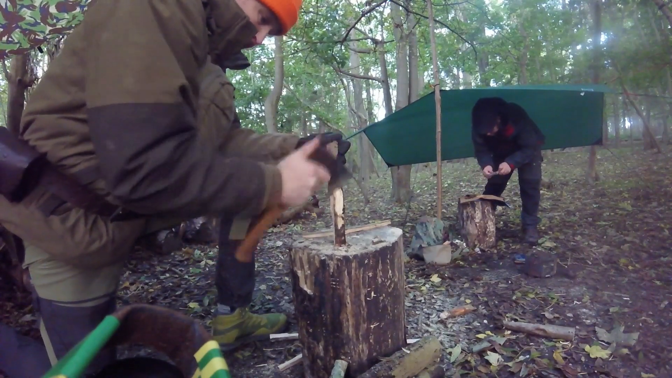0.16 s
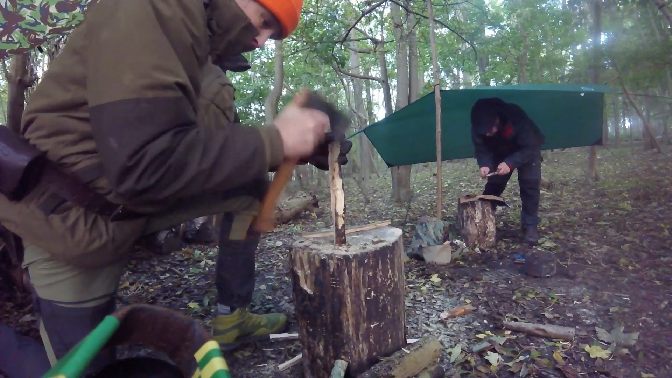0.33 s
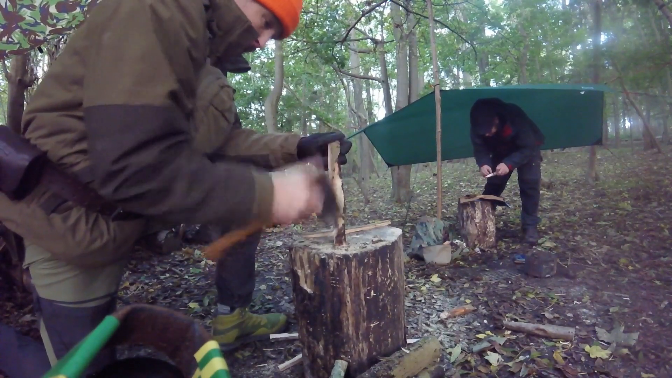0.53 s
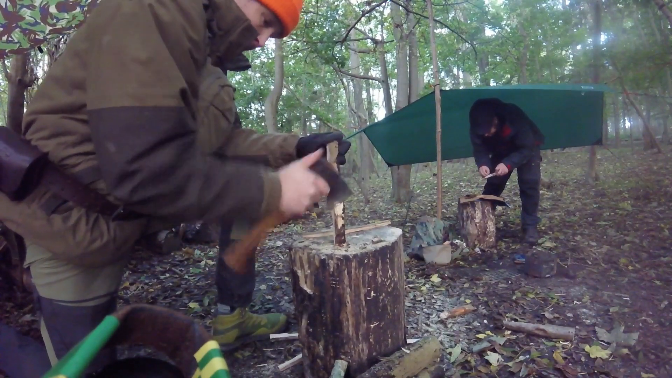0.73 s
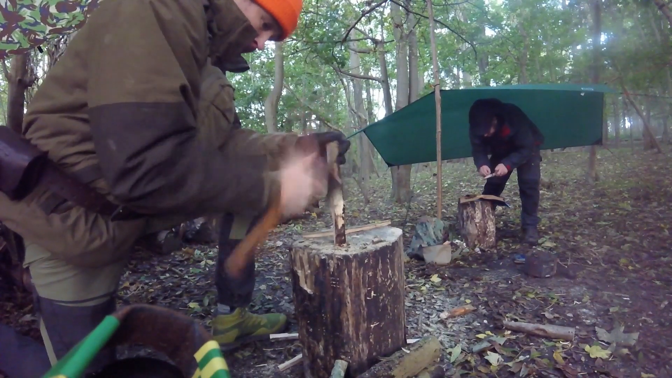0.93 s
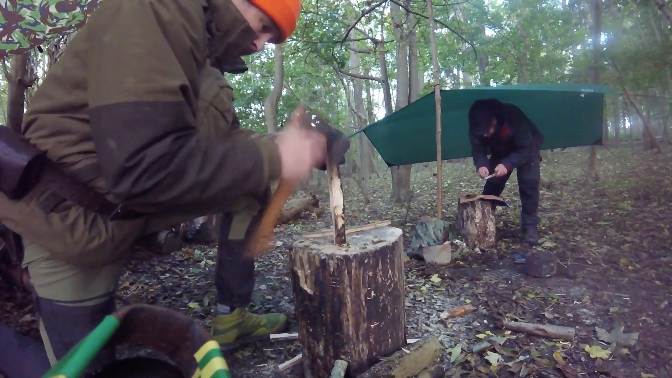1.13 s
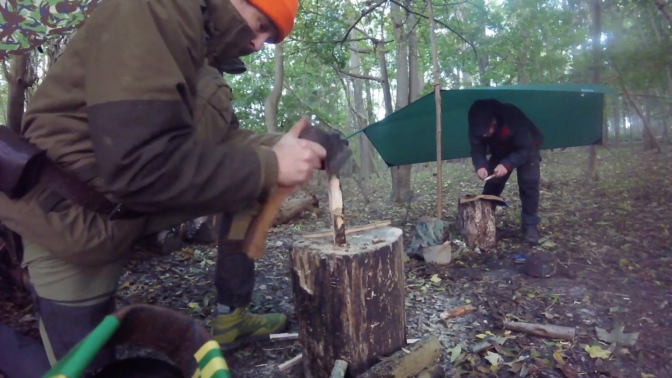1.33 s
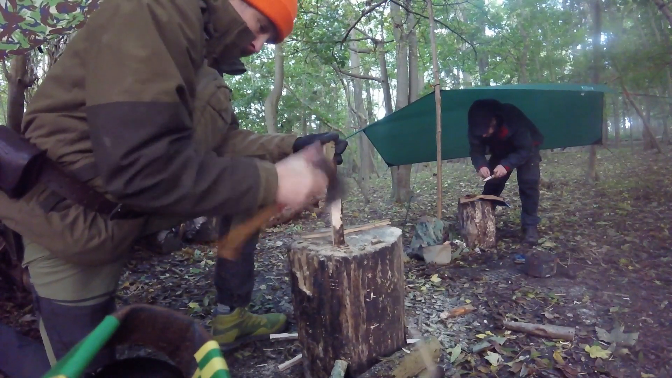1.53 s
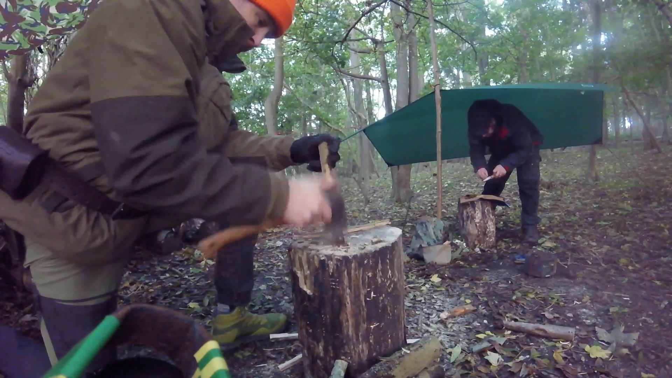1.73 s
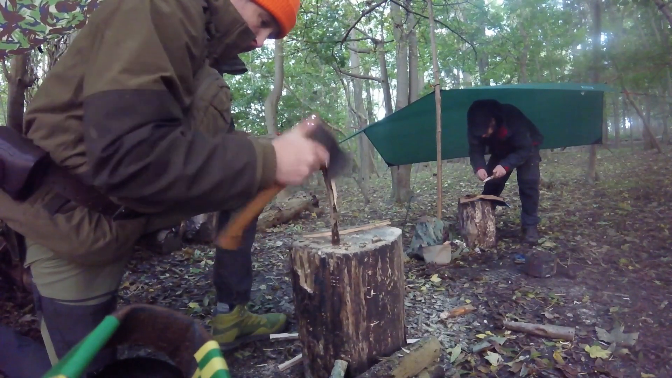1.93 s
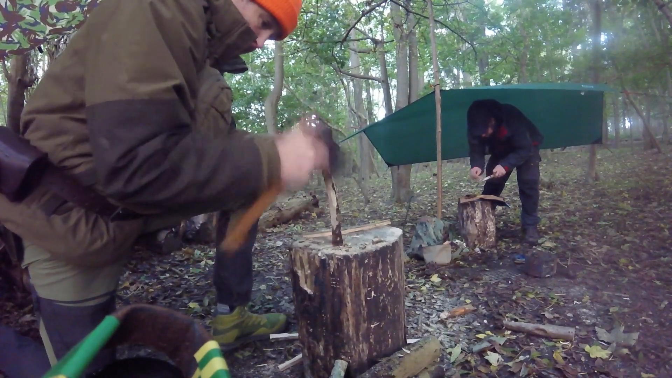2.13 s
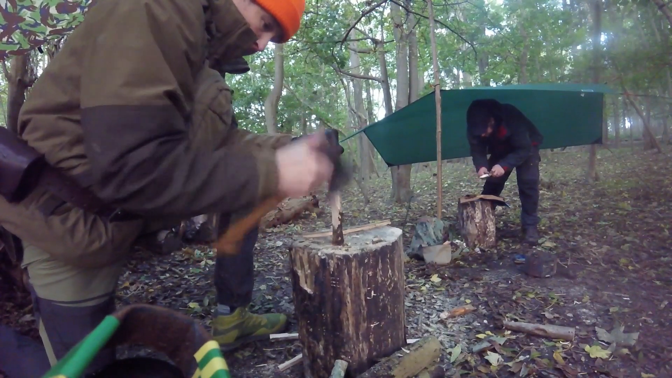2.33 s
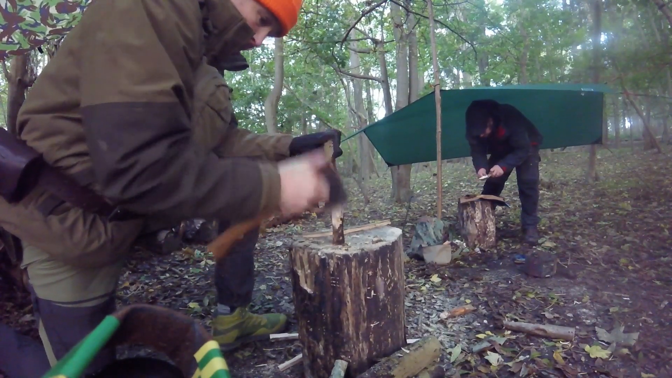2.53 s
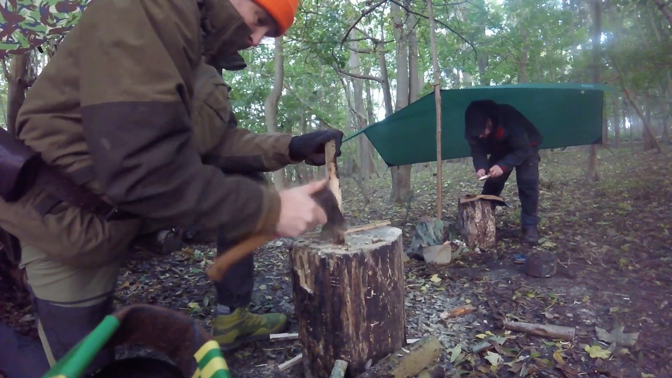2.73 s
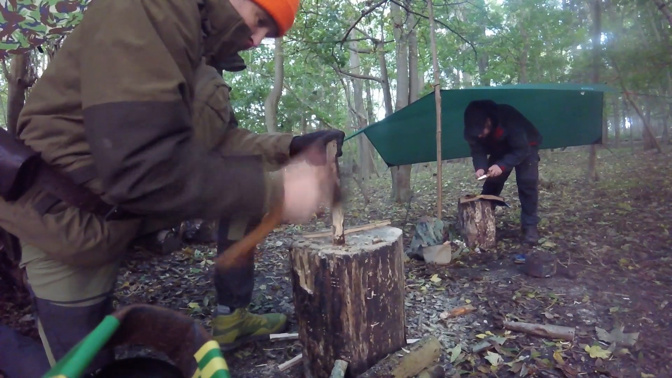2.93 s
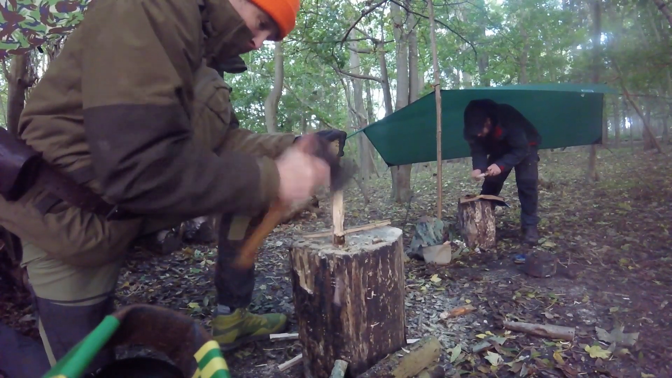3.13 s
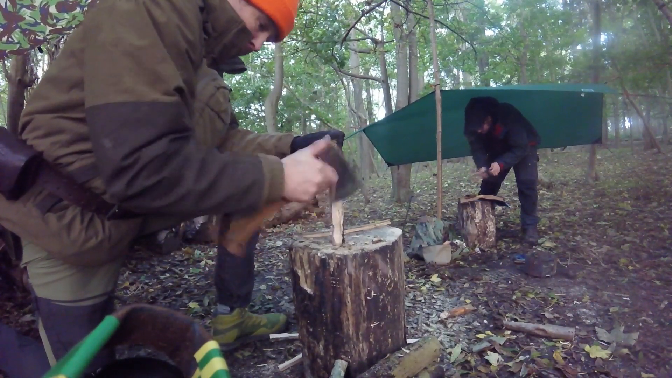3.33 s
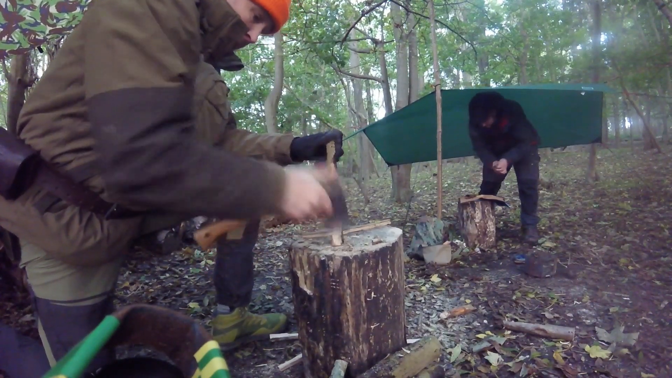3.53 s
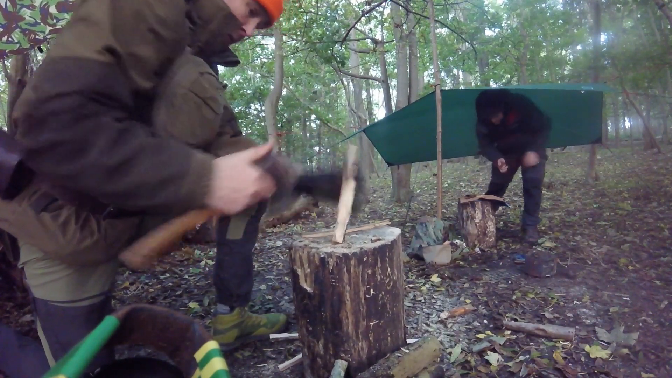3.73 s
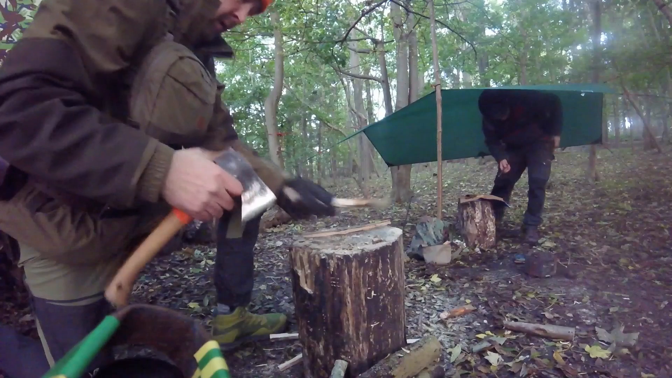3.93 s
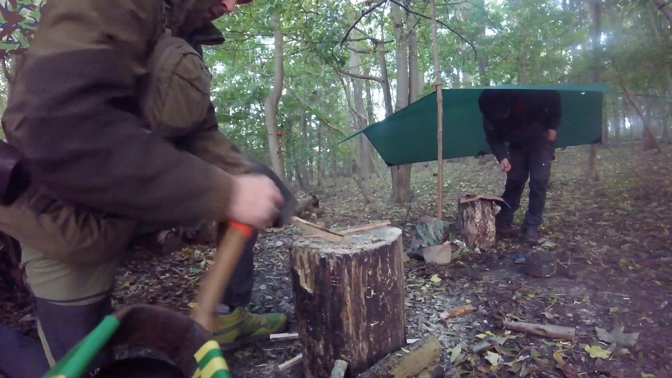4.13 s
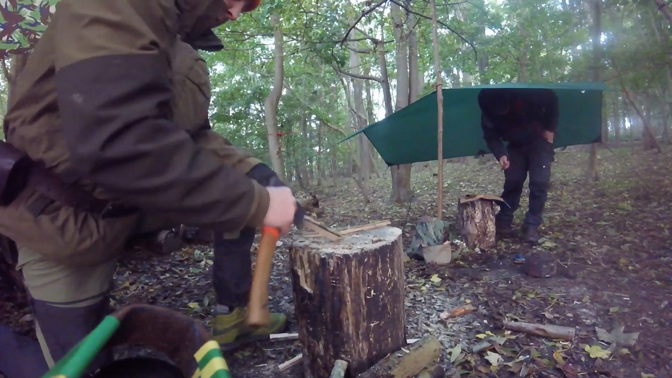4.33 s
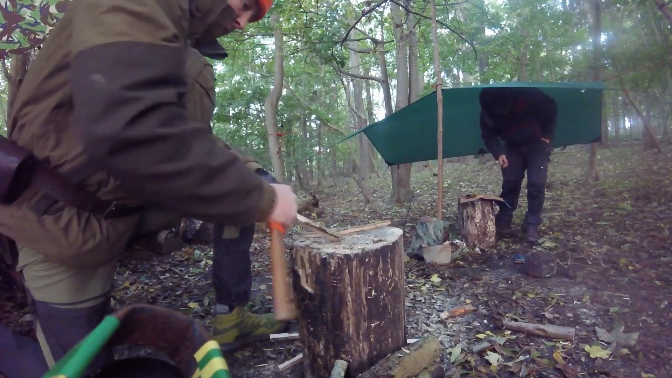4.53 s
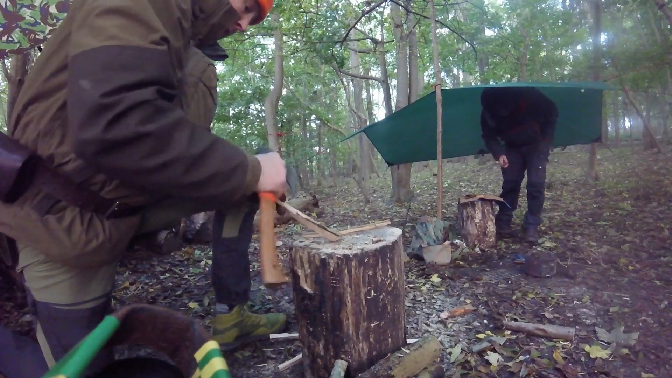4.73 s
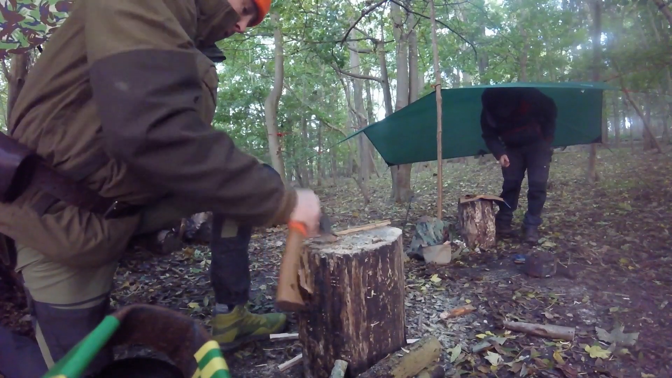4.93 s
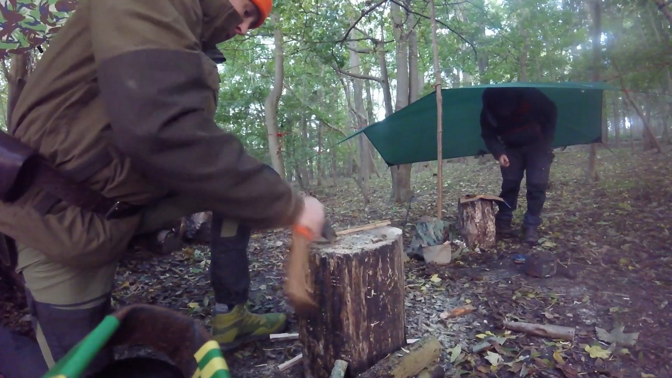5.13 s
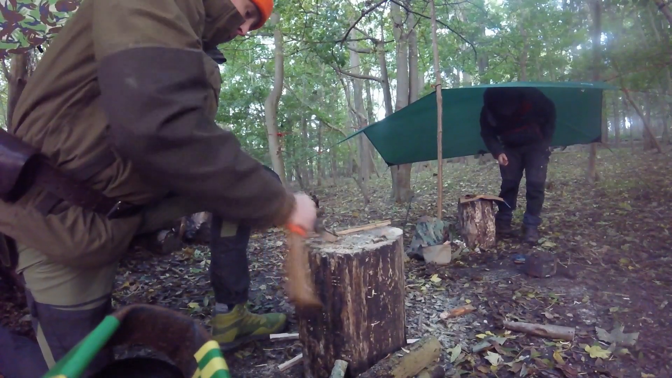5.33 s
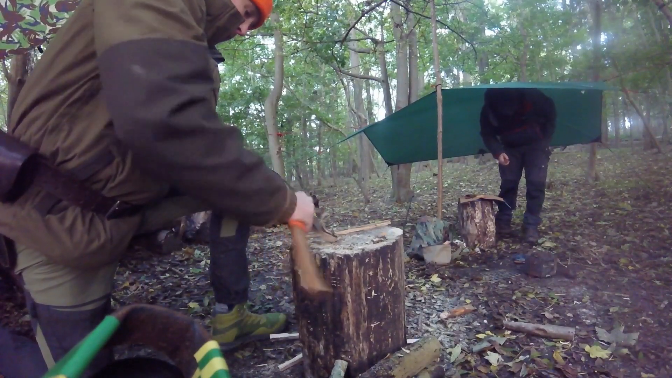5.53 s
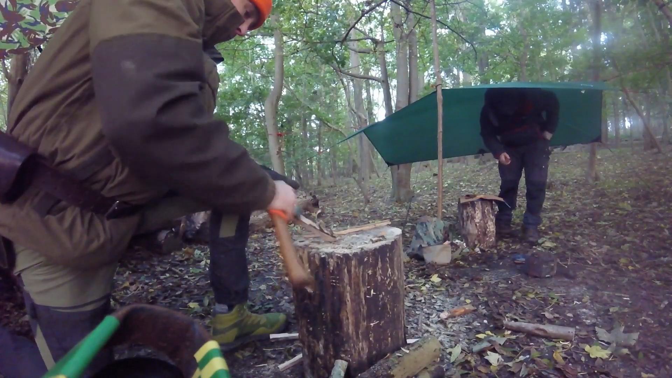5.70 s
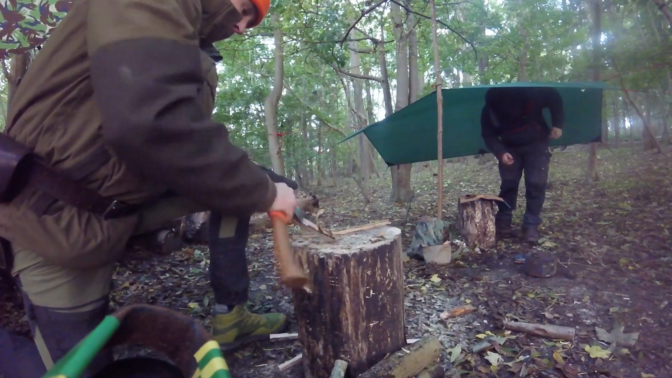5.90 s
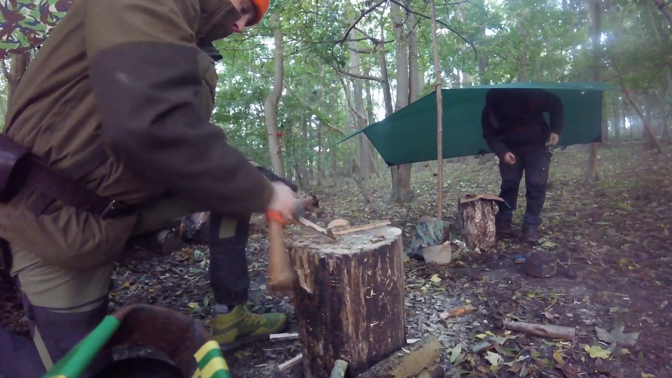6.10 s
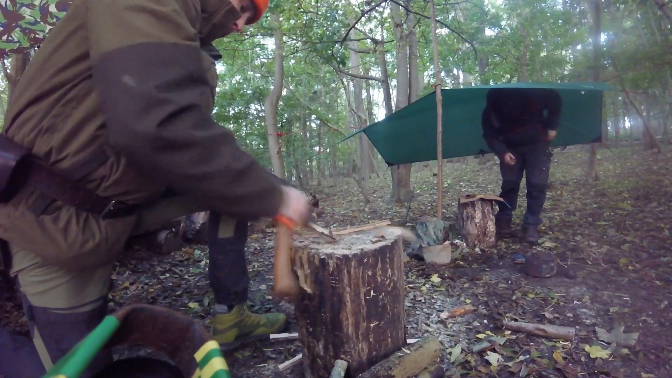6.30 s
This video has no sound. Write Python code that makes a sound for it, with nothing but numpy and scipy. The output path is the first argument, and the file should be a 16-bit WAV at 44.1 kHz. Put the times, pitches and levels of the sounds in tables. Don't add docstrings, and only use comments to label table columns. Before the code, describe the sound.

Close woody taps and fibrous rips from a blade on a stump, dense at first, thinning into quiet shaving pushes amid woodland wind rumble.

```python
import sys
import numpy as np
from scipy import signal
from scipy.fft import rfft, irfft
from scipy.io import wavfile
from scipy.ndimage import uniform_filter1d

SR = 44100
rng = np.random.default_rng(int(sys.argv[2]) if len(sys.argv) > 2 else 0)


def persist_wave(psi):
    counts = np.round(np.clip(psi, -1, 1) * 32767).astype(np.int16)
    wavfile.write(sys.argv[1], SR, np.atleast_2d(counts).T)


def boost_factor(decibels):
    exponent = np.asarray(decibels, float) / 20
    return 10 ** exponent


N = 284886


def bites():
    # start_s, peak_db, ring_centre_hz, stick_tick_db, steel_tick_db
    strikes = [(0.22, -26.5, 751.5, -16, -19), (0.493, -24.5, 720, -11, -24),
               (0.75, -16.5, 875, -26, -15.5), (1.007, -9, 900, -33, -16.5), (1.242, -11.5, 875, -31, -24),
               (1.253, -11.5, 713, -9.5, -34), (1.464, -13.5, 875, -14, -30), (1.655, -20, 875, -26, -25),
               (2.509, -20.5, 715, -24, -24), (2.771, -20, 800, -11.5, -29), (3.021, -20, 875, -12.5, -14),
               (3.246, -15.5, 827, -26, -8.5), (4.907, -27.5, 716, -7, -21), (5.093, -19.5, 850, 0, -19)]
    # pitch_hz, level_db, t60_s
    stick = [(1210, -21, 0.01), (1422, -1.5, 0.018), (2003, -3, 0.016), (3027, -4, 0.031),
             (3960, 3, 0.0097), (5150, -20, 0.017), (6750, -21, 0.059)]
    out = np.zeros(N)
    steel = np.transpose(stick)[0][:, None] > 2600
    spots = rng.standard_normal((len(strikes), len(stick), 1))
    for (s, db, hz, tick_db, steel_db), spot in zip(strikes, spots):
        t60 = 0.028 * (800 / hz) ** 6
        t, wood = ring(hz, t60, contact_s=0.00037, sag=0.21)
        chance_db = 6.3 * spot + np.where(steel, steel_db, tick_db)
        tick = modes(stick, t, chance_db) * (1 - np.exp(-t / 0.00019))
        add(out, s, boost_factor(db) * (wood + tick))
    return out


def rips():
    # start_s, level_db, hold_s, brightness_db, shaving_song_hz
    nicks = [(.220, -46, 0.0048, 3, 3240), (.494, -41.5, 0.015, 6, 3190), (.751, -37.5, 0.0036, 2, 3540),
             (1.007, -32.5, 0.0051, -3, 3730), (1.242, -48, 0.0089, 10, 3650),
             (1.253, -34.5, 0.0036, 13.5, 4160), (1.464, -47, .011, -23, 3050),
             (1.655, -53, 0.013, 2, 3530), (2.504, -39, .012, 8.5, 3650), (2.772, -37, 0.018, 6.5, 3750),
             (3.020, -32.5, 0.009, -2, 3030), (3.246, -36.5, 0.0061, -21, 3120),
             (4.907, -51.5, 0.018, 10, 3880), (5.093, -37, 0.0019, -28, 2660)]
    # start_s, level_db, hold_s, brightness_db, shaving_song_hz
    runs = [(0.001, -50, 0.0037, -14, 2920), (.526, -45, .003, -5, 3100), (1.020, -49, 0.0058, 20, 3020),
            (1.475, -40, 0.0053, 11.5, 2900), (1.499, -49.5, 0.0057, -24, 3030),
            (1.682, -48.5, .008, -6, 5200), (1.713, -47.5, 0.0031, -10, 2770),
            (2.22, -50, .017, -7.5, 3200), (2.248, -51, 0.0042, 8.5, 3200), (2.295, -58, .0025, -9.5, 2900),
            (3.261, -33, 0.0055, 8, 3600), (3.481, -40, 0.016, 1, 2950)]
    # start_s, level_db, hold_s,
    # brightness_db, shaving_song_hz
    pushes = [
        (3.78, -59.5, 0.05, -9, 2780),
        (4.960, -54.5, 0.0053, -4.5, 3140),
        (5.165, -50.5, 0.0071, 2, 3140),
        (5.338, -52, .019, 7, 7100),
        (5.54, -57, .035, 6.5, 3600),
        (5.805, -51, .017, 7.5, 3940),
        (6.032, -52.5, .009, 5.5, 2560),
        (6.272, -55, .012, 8, 3400),
    ]
    # start_s, level_db, hold_s, brightness_db, shaving_song_hz
    snaps = [
        (2.937, -66, .008, -10, 6000),
        (6.287, -47, .002, 10, 7300),
        (6.294, -42, .002, 12, 5650),
    ]
    # pitch_hz, level_db per Hz
    tear_spectrum = [(310, -27), (520, 7.5), (856, -5), (1260, 3), (1960, -4), (3770, -6), (4470, -7),
                     (5380, -9), (6120, -8.5), (7370, -12.5), (9390, -24), (12100, -23), (15700, -25)]
    # rise per hold, t60_s, t60 gained per hold, song_db
    kinds = ((nicks, (0.43, 0.0413, 1.5, -5)), (runs, (0.1, 0.133, -3.5, -9)),
             (pushes, (1.42, 0.19, -3.5, -13.5)), (snaps, (.3, .018, 1.5, -1.5)))
    tears = sorted((*row, *kind) for table, kind in kinds for row in table)

    burst_db = 3.0 * rng.exponential(1, N // 40 + 1).clip(0, 4)
    fibres = rng.standard_normal(N) * boost_factor(burst_db.repeat(40)[:N])
    slivers = patchy(ported(fibres, 4), 4.5, size=128, bins=2, frames=5)
    tear = coloured(slivers, tear_spectrum, lo_hz=1940)
    bright = signal.sosfiltfilt(signal.butter(3, 8800, "high", fs=SR, output="sos"), tear)

    force, shine, song = np.zeros((3, N))
    t = np.arange(SR // 2) / SR
    rubs = rng.standard_normal((len(tears), len(t)))
    for (s, db, hold, bright_db, hz, swell, t60, linger, sing_db), rub in zip(tears, rubs):
        rise = swell * hold
        t60 = t60 + linger * hold
        stroke = boost_factor(-60 * np.maximum(t - rise - hold, 0) / t60) * np.minimum(t / rise, 1)
        add(force, s, (stroke * boost_factor(db)) ** 2)
        add(shine, s, (stroke * boost_factor(db + bright_db)) ** 2)
        voice = shaving_song(rub, hz) + boost_factor(-9) * shaving_song(rub, 0.452 * hz)
        add(song, s, stroke * boost_factor(db + sing_db) * voice)
    return np.sqrt(force) * (tear - bright) + np.sqrt(shine) * bright + song


def shaving_song(rub, hz):
    return evened(resonate(resonate(rub, hz, 320), hz, 320))


def thuds():
    # start_s, peak_db, ring_centre_hz, contact_s, boom_db
    landings = [(0.001, -13, 796, 0.0039, -1.5), (0.016, -25, 520, 0.0015, -6),
                (1.5, -20.5, 836, .0045, -16), (1.504, -6.5, 634, .0017, -3), (1.513, -32, 564, .002, -26),
                (1.7148, -1.5, 729.4, .0016, -8.5), (1.7215, -16, 620, .0012, -29),
                (1.728, -20, 585, .0015, -24), (2.298, -25, 742.6, 0.0017, 5.5),
                (2.303, -24.5, 589, 0.0016, -3), (3.27, -13.5, 764, .004, -4.5),
                (3.275, -6, 643, 0.0019, -28), (3.283, -19, 554, 0.0019, -14),
                (3.5, -8.5, 833, 0.0041, -15), (3.504, -7.5, 669, 0.0015, -21),
                (3.51, -11.5, 550, 0.00075, -6.5)]
    # start_s, peak_db, ring_centre_hz, t60_s
    knocks = [(0.227, -29.5, 720, .045), (0.497, -28, 737, 0.062), (0.504, -14, 901, 0.02),
              (0.512, -20.5, 741.4, 0.044), (0.756, -19.5, 627, 0.042), (1.019, -16, 626, 0.05),
              (1.257, -14, 610, 0.036), (1.475, -17.5, 720, 0.036), (1.663, -32.5, 652, 0.09),
              (2.232, -33, 653, .056), (2.251, -31, 618, 0.048), (2.521, -20.5, 616, 0.041),
              (2.781, -26, 677, 0.053), (2.792, -28, 718, 0.087), (2.805, -24.5, 620, 0.035),
              (3.033, -20, 633, 0.058), (3.479, -37, 737, 0.12), (4.133, -32, 704, 0.052),
              (4.195, -31, 696, 0.073)]
    # start_s, peak_db, ring_centre_hz
    nudges = [(4.964, -45, 706), (5.187, -36.5, 650), (5.364, -39, 682), (5.594, -35.5, 700),
              (5.834, -40, 766), (6.053, -35, 830), (6.06, -28, 550), (6.075, -36, 754), (6.141, -35, 693),
              (6.279, -36.5, 730), (6.284, -33, 543), (6.293, -36, 727)]
    out = np.zeros(N)
    for s, db, hz, contact_s, boom_db in landings:
        add(out, s - .001, thud(db, hz, 0.033, contact_s, boom_db))
    for s, db, hz, t60 in knocks:
        add(out, s - .001, thud(db, hz, t60, contact_s=0.001394, boom_db=-15.5))
    for s, db, hz in nudges:
        add(out, s - .001, thud(db, hz, .048, contact_s=0.0012, boom_db=-5))
    return out


def thud(db, hz, t60, contact_s, boom_db):
    boom_hz, boom_t60 = 288.3, 0.027
    t, wood = ring(hz, t60, contact_s, sag=0.23)
    boom = boost_factor(boom_db - 60 * t / boom_t60) * np.sin(2 * np.pi * boom_hz * t)
    return boost_factor(db) * (wood + boom * (1 - np.exp(-t / 0.0015)))


def ring(centre_hz, t60, contact_s, sag):
    # pitch_hz, level_db, t60_s
    stump = [(442, -22, 0.022), (604.5, -9.5, 0.045), (875, -4, 0.025), (1383, -26, 0.01),
             (1411, -31.5, 0.029), (2134, -28, 0.013)]
    t = np.arange(SR // 8) / SR
    turns = np.cumsum(centre_hz * (1 + sag * (np.exp(-t / 0.0034) - .3))) / SR
    spot = boost_factor(-60 * t / t60) * np.sin(2 * np.pi * turns)
    wood = (spot + modes(stump, t)) * (1 - np.exp(-t / contact_s)) ** 2
    return t, wood / abs(wood).max()


def modes(table, t, chance_db=0):
    hz, db, t60 = np.transpose(table)[..., None]
    return (boost_factor(db + chance_db - 60 * t / t60) * np.sin(2 * np.pi * hz * t)).sum(0)


def resonate(x, hz, width_hz):
    turn = np.exp(2j * np.pi * hz * np.arange(len(x)) / SR)
    r = np.exp(-np.pi * width_hz / SR)
    return (turn * signal.lfilter([1 - r], [1, -r], x / turn)).real


def trees(x):
    t = np.arange(SR // 2) / SR
    ground, canopy = rng.standard_normal((2, len(t))) * np.minimum(t / 0.0056, 1)
    ground = signal.lfilter(*signal.butter(1, 6000, fs=SR), ground) * boost_factor(-60 * t / 0.078)
    canopy = signal.lfilter(*signal.butter(2, [1500, 8000], "band", fs=SR), canopy) * boost_factor(-60 * t / .55)
    tail = ground / np.linalg.norm(ground) + boost_factor(-7.5) * canopy / np.linalg.norm(canopy)
    return signal.fftconvolve(x, tail)[:N]


def wind():
    # pitch_hz, level_db per Hz
    buffet_spectrum = [(4.7, -31), (8.0, -1), (21, 0), (34, -2), (68, -11), (157, -31), (200, -32),
                       (260, -62), (440, -120)]
    eddies = coloured(rng.standard_normal(N), buffet_spectrum)
    low = signal.sosfiltfilt(signal.butter(2, 50, fs=SR, output="sos"), eddies)
    slow, fast = [steadied(v) for v in (low, eddies - low)]
    lumps = slow + 0.1 * (slow ** 2 - 1)
    buffet, rumble = gusts()
    return buffet * evened(lumps) + rumble * fast


def steadied(x):
    power = uniform_filter1d(x ** 2, size=SR // 9)
    return evened(x / np.sqrt(power + 0.098 * x.var()))


def gusts():
    # centre_s, buffet_db, half_length_s, upper_rumble_db (above the buffet)
    gust_rows = [(0.097, -24, 0.016, -6.5), (.24, -19, 0.028, -9.5), (0.317, -24, 0.042, -10),
                 (0.44, -25, 0.024, -22), (0.773, -30.5, 0.025, -10), (.89, -20.5, 0.033, -23),
                 (1.003, -21, .03, -19), (1.25, -30, 0.066, -30), (1.423, -19.5, 0.038, -17.5),
                 (1.618, -26.5, 0.019, -22), (1.761, -26, 0.0434, -11), (1.896, -20.5, 0.033, -20),
                 (2.01, -20.5, 0.075, -32), (2.122, -21, 0.084, -27), (2.314, -29.5, 0.031, -16),
                 (2.59, -22.5, 0.048, -15), (2.72, -24, 0.045, -7.5), (2.81, -20, 0.049, -9.5),
                 (2.956, -22.5, 0.028, -21), (3.424, -10, 0.023, -10), (3.554, -31, 0.022, -10),
                 (3.745, -29, 0.019, -30), (3.853, -15.5, 0.022, -16.5), (4.395, -21, 0.029, -17),
                 (4.52, -30.5, 0.061, -12), (4.748, -22.5, 0.028, -17), (5.093, -29.5, 0.065, -20),
                 (5.735, -27.5, 0.022, -12), (6.09, -25.5, 0.033, -30), (6.28, -24.5, 0.077, -22)]
    # time_s, level_db
    breeze_db = [(0.0, -27), (0.6, -32), (0.9, -28), (1.6, -31.5), (2.1, -33), (2.45, -29.5), (2.8, -39),
                 (3.15, -32), (4.0, -27.5), (4.6, -30), (5.0, -37), (5.3, -36), (5.6, -30), (6.46, -34.5)]
    t = np.arange(N) / SR
    buffet = boost_factor(np.interp(t, *np.transpose(breeze_db))) ** 2
    rumble = buffet * boost_factor(-16) ** 2
    for s, db, half_s, rumble_db in gust_rows:
        bell = boost_factor(db) ** 2 * np.exp(-((t - s) / half_s) ** 2)
        buffet = buffet + bell
        rumble = rumble + bell * boost_factor(rumble_db) ** 2
    return np.sqrt(buffet), np.sqrt(rumble)


def leaves():
    # pitch_hz, level_db per Hz
    hiss_spectrum = [(71, -70), (120, -2.5), (226, -11.5), (368, -12), (532, -13), (577, -11.5), (679, -12),
                     (832, -12), (903, -15.5), (1110, -23), (1300, -28.5), (2950, -31), (8000, -39),
                     (9810, -47), (15700, -40.5)]
    hiss = coloured(ported(rng.standard_normal(N), -19), hiss_spectrum, lo_hz=1400, hi_hz=9300)
    return boost_factor(-63) * patchy(hiss, 1.5, size=512, bins=8, frames=10)


def whine():
    pitch_hz, frame_hz, first_s, level_db = 9635, 29.97, .0253, -72
    since = (np.arange(N) / SR - first_s) % (1 / frame_hz)
    return boost_factor(level_db) * np.sqrt(2) * np.sin(2 * np.pi * pitch_hz * since) * (since < .5 / frame_hz)


def ported(x, ring_db):
    # pitch_hz, width_hz, level_db
    port = [(3450, 350, 0), (5300, 300, -2), (7300, 350, -2)]
    rings = (boost_factor(db) * signal.lfilter(*signal.iirpeak(hz, hz / width, SR), x) for hz, width, db in port)
    return x + boost_factor(ring_db) * sum(rings)


def patchy(x, patchy_db, size, bins, frames):
    z = signal.stft(x, nperseg=size)[2]
    patches = rng.standard_normal(z.T.shape).T
    patches = uniform_filter1d(patches, size=bins, axis=0)
    patches = evened(uniform_filter1d(patches, size=frames, axis=1))
    return signal.istft(z * boost_factor(patchy_db * patches), nperseg=size)[1][:N]


def coloured(x, points, lo_hz=0, hi_hz=SR / 2):
    hz, (f, db) = np.fft.rfftfreq(len(x), 1 / SR), np.transpose(points)
    z = rfft(x) * boost_factor(np.interp(np.log(hz + 1), np.log(f + 1), db))
    band = irfft(z * (hz >= lo_hz) * (hz <= hi_hz), len(x))
    return irfft(z, len(x)) / np.std(band)


def evened(x):
    return x / np.sqrt(np.mean(x ** 2) + 1e-20)


def add(mix, s, sound):
    part = mix[max(round(s * SR), 0):][:len(sound)]
    part += sound[:len(part)]


def band_gating(x):
    # centre_s, length_s, kept_low_hz, kept_high_hz
    starved = [(.607, .016, 1750, 3500), (.710, .021, 1550, 3050), (1.416, .022, 1450, 1500),
               (1.647, .012, 3350, 3650), (1.974, .023, 2950, 3000), (3.315, .016, 3400, 6300),
               (4.532, .017, 1800, 2550), (4.807, .018, 2400, 3700), (5.258, .013, 2200, 3400),
               (5.493, .012, 2200, 3400), (5.749, .018, 2200, 3300), (6.069, .014, 2400, 2700),
               (6.151, .019, 3200, 3800)]
    # pitch_hz, level_db
    need = [(6000, -60), (6500, -9), (8200, -5), (12400, -3.5), (13000, 5.5), (15500, 6.5)]
    hz, t, z = signal.stft(x, SR, nperseg=512, noverlap=384)
    power = uniform_filter1d(uniform_filter1d(abs(z) ** 2, size=4, axis=0), size=4, axis=1)
    usual = np.median(power, axis=1, keepdims=True)
    whims = rng.standard_normal((len(t) // 8 + 1, len(hz) // 6 + 1))
    whims = whims.repeat(8, axis=0).repeat(6, axis=1)[:len(t), :len(hz)].T
    need_db = np.interp(hz, *np.transpose(need))[:, None] + 1.8 * whims
    keep = (power > usual * boost_factor(need_db) ** 2) * (hz[:, None] < 15550) * 1.
    for s, length, *kept_hz in starved:
        near = abs(hz[:, None] - kept_hz).min(1) < 130
        keep[np.ix_(near, abs(t - s) < .016)] = 2.5
        cut = ~near & (hz > 1500) & (abs(hz - 9635) > 150)
        half_s = (length / 2 - .002) * (.6 + hz[:, None] / 16000)
        keep[cut[:, None] & (abs(t - s) < half_s)] = 0
    return signal.istft(z * keep, SR, nperseg=512, noverlap=384)[1][:N]


def scene():
    work = bites() + thuds() + rips()
    return (work + boost_factor(-17.0) * trees(work) + wind() + leaves())[None]


def top_cut(x):
    return signal.sosfilt(signal.butter(12, 15830, fs=SR, output="sos"), x)


def record(dry):
    heard = band_gating(dry[0] + whine())
    return top_cut(heard[None])


dry = scene()
out = record(dry)
persist_wave(out)
```